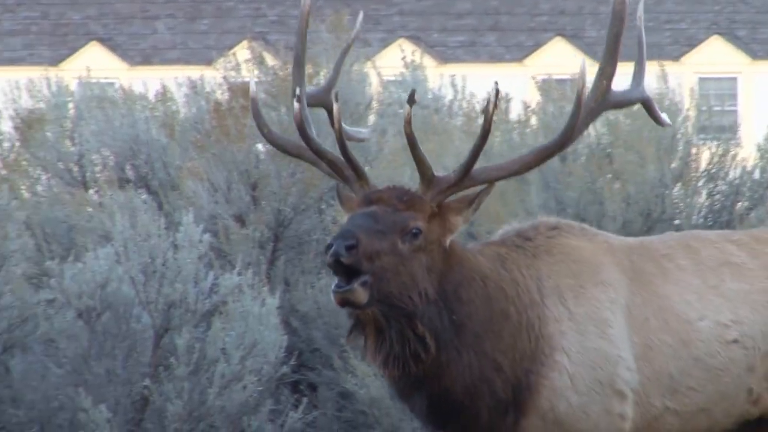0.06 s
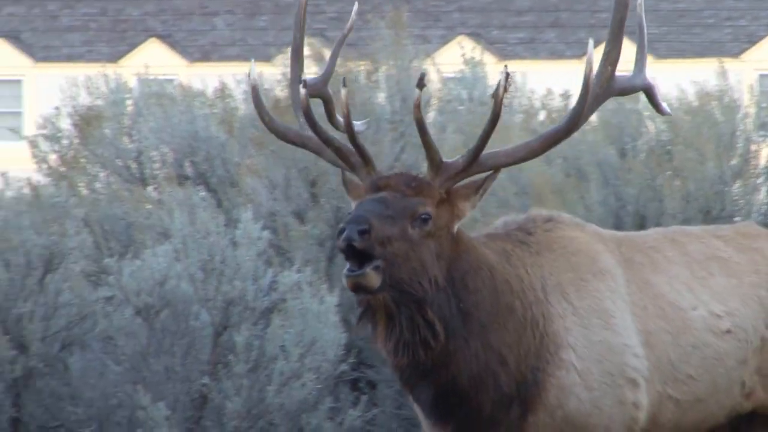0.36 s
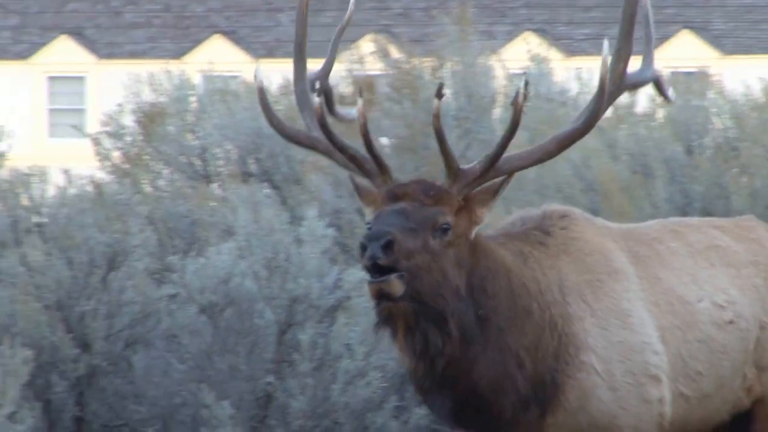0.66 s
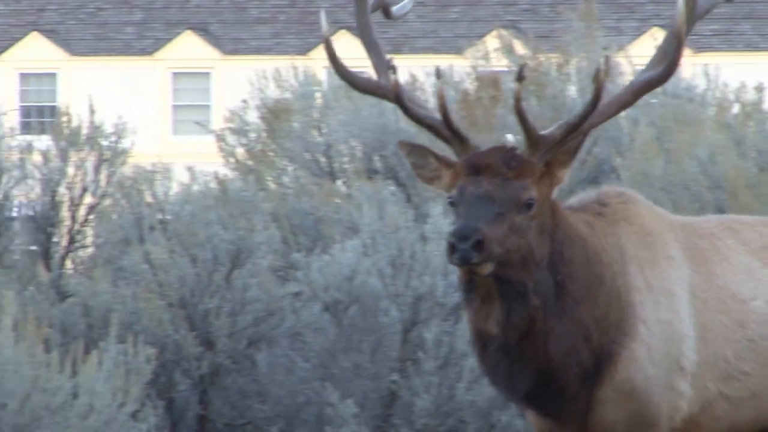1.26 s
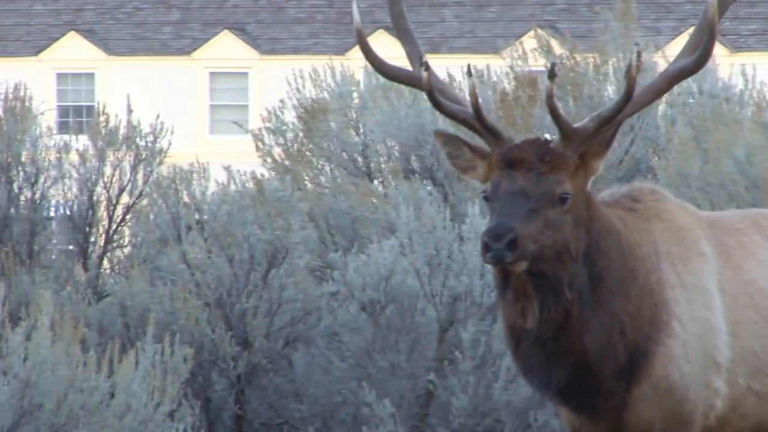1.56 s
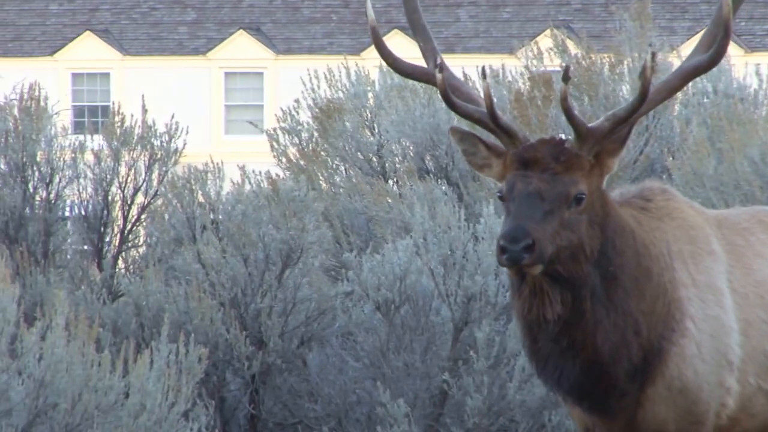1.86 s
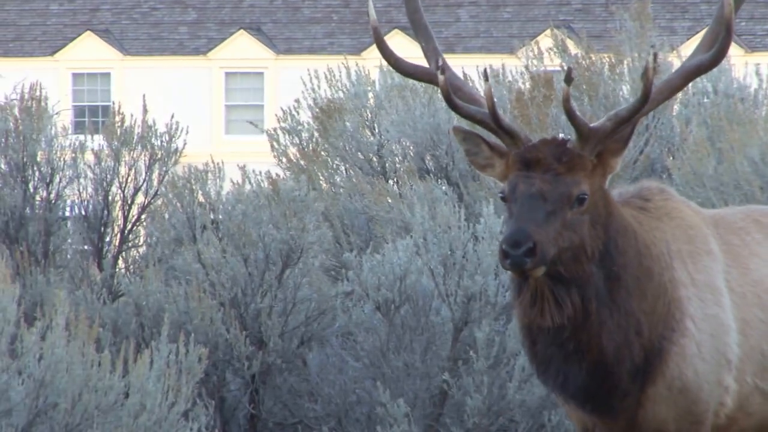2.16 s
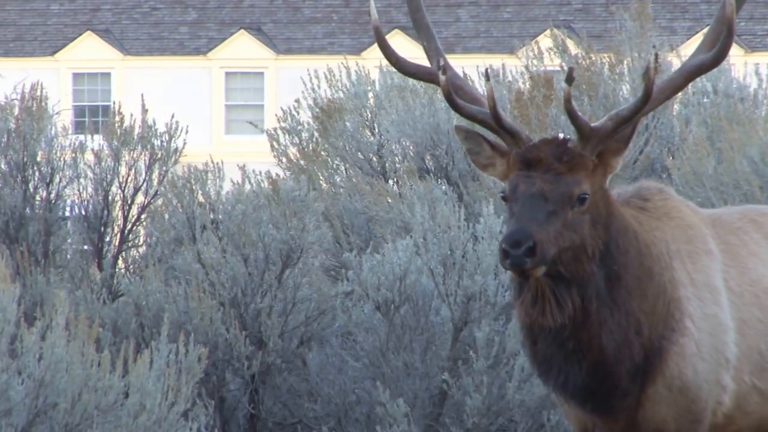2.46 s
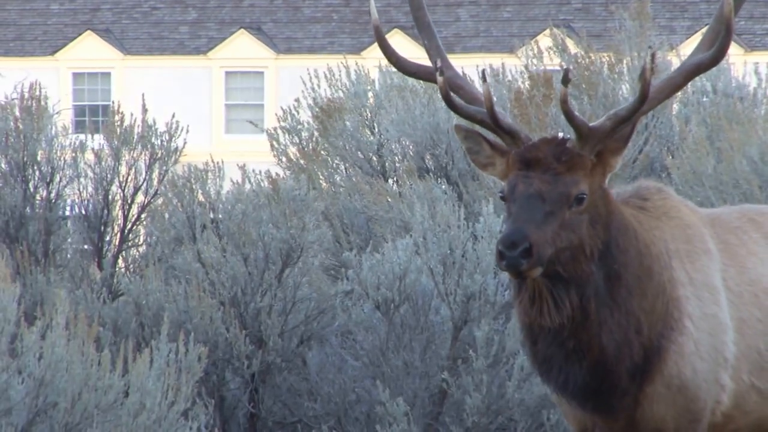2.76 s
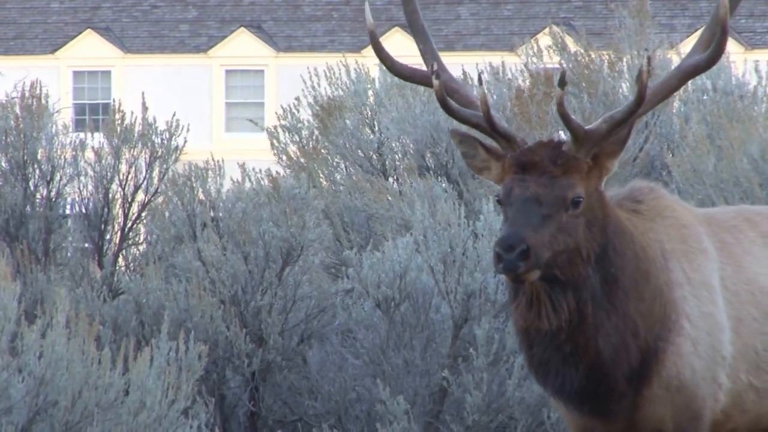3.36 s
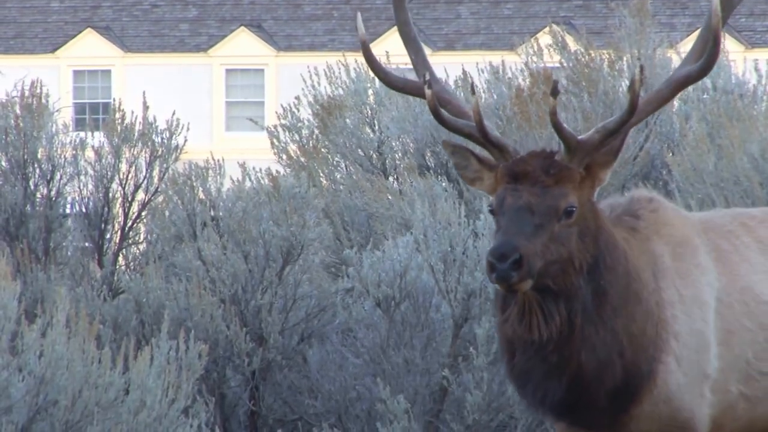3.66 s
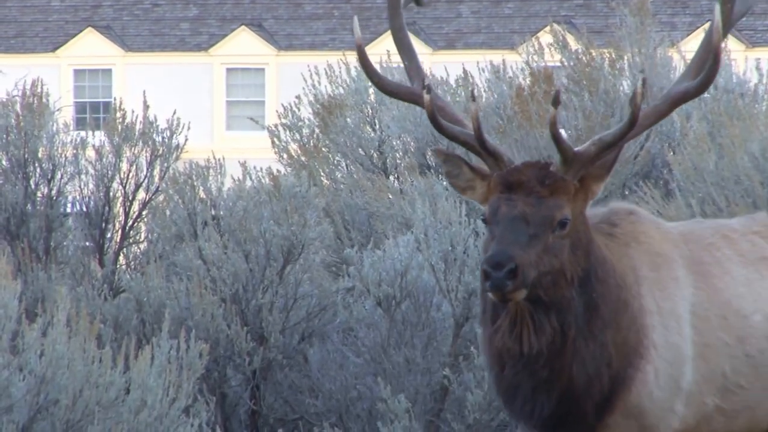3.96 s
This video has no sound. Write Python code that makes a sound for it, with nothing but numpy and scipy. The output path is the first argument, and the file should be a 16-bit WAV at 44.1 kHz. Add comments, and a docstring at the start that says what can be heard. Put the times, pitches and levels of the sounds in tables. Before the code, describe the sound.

The loud end of an elk's bugle, shrill and raspy, breaks and slides down into a short grunt. It echoes briefly across open brush, then twigs click faintly in the quiet while far-off engines rumble.

```python
"""A high, hoarse whistle rides on a low voice, breaks, slides down and stops in a grunt:
a bull elk is ending his bugle among sagebrush. His vocal folds make the low voice and shake the
whistle, which rings through throat and muzzle. Buildings and slopes throw back dull echoes.
Then a few twigs snap faintly and a bird whistles far off. Distant engines rumble throughout."""
import sys
import numpy as np
from scipy import signal
from scipy.fft import rfft, irfft
from scipy.io import wavfile

SR = 44100
rng = np.random.default_rng(int(sys.argv[2]) if len(sys.argv) > 2 else 0)


def master(y):
    """Save y as 16-bit WAV."""
    cut = np.clip(np.atleast_2d(y).T, -1, 1)
    pcm = np.round(cut * 32767)  # scale
    wavfile.write(sys.argv[1], SR, pcm.astype(np.int16))


N = 176400   # 4 seconds

WHISTLE_PITCH = [(0, 851.5), (.038, 873), (.052, 830), (.07, 875), (.09, 828), (.11, 887.6), (.2, 888),
                 (.3, 870.4), (.33, 843), (.365, 772.6), (.4, 704.4), (.455, 639.7), (.5, 636.7),
                 (.53, 595.5), (.56, 528), (.61, 520), (.66, 497.5), (.685, 413), (.72, 315)]   # the falling note: t/s, f/Hz
def bugle():
    """Whistle, breathy rasp and low voice sound together, tied to the same swinging vocal folds."""
    hz, = in_time(WHISTLE_PITCH)
    octaves_down = np.log2(900 / hz)
    voice, fold_phase = low_voice()
    return throat(whistle(hz, octaves_down, fold_phase)) + rasp(octaves_down, fold_phase) + voice


WHISTLE_FORCE = [(0, -10.5), (.04, -16), (.1, -18), (.2, -17.5), (.285, -22.5), (.322, -10.5), (.345, -20),
                 (.41, -17), (.455, -12.5), (.49, -15), (.515, -18.5), (.565, -12), (.62, -16),
                 (.652, -11.5), (.675, -16.5), (.705, -20), (.725, -46), (.75, -99)]   # strength before the throat shapes it: t/s, level/dB
HOARSENESS = [(0, 0.17), (.035, 0), (0.049, 0.23), (0.065, 1), (.087, 0.02), (.1, 0.77), (.14, 0.6),
              (0.279, 0.54), (.3, 0.2), (0.325, .08), (.338, 1.02), (.385, 0.65), (.42, 0.4), (0.454, 0),
              (.498, 0.01), (0.512, 0.66), (.545, 0.53), (.56, 0), (.655, 0.1), (.68, 0.65), (.72, 0.7)]   # flips between clear and hoarse: t/s, roughness (0 clear, 1 hoarse)
BRIGHTNESS = [(0, -4.5), (0.036, -20), (0.05, 2.5), (0.069, -5.5), (0.088, 1), (0.111, 0), (.28, 1.5),
              (.32, 0), (.38, 0.5), (0.448, -8.5), (.51, -2.5), (0.572, -7), (0.614, -2), (0.657, -9.5)]   # tilt towards the high harmonics: t/s, slope/(dB per octave)
EVEN_BOOST = [(0, 10), (.04, -2.5), (0.081, -5.5), (.18, -12.5), (.22, -5), (0.292, -8.5), (0.328, -0.5),
              (0.391, 0), (0.449, -2.5), (0.551, -2.5), (0.591, -5), (0.649, 3.5)]   # even harmonics against odd ones: t/s, level/dB
def whistle(hz, octaves_down, fold_phase):
    """Ten harmonics (multiples of the pitch), shaken by the low voice and by chaotic flutter."""
    (force_db,), (rough,) = in_time(WHISTLE_FORCE), in_time(HOARSENESS)
    (bright_db,), (even_db,) = in_time(BRIGHTNESS), in_time(EVEN_BOOST)
    wobble = np.sin(turning(48.13 * (1 + .3 * drift(hz=24))))   # a half-regular shake
    shake_radians = .59 * drift(hz=95) + .086 * np.sin(fold_phase) + .65 * wobble
    phase = turning(hz) + rough * shake_radians
    harmonics = 0
    for k in range(1, 11):
        dulling_db = -3 * octaves_down * (k - 1)   # duller as the pitch falls
        db = dulling_db + bright_db * np.log2(k) + even_db * (k % 2 == 0)
        harmonics += from_db(db) * np.sin(k * phase)
    flutter = 1 + .55 * rough * (drift(hz=95) + np.cos(fold_phase))
    return np.sqrt(2) * from_db(force_db) * harmonics * flutter


LOW_VOICE = [(0, 139.6, -38, 0.2), (.04, 150.3, -31.5, 0.01), (.12, 145.5, -38.5, 0.16),
             (.24, 140.7, -41, 0.08), (.32, 151.3, -43, 0.65), (.45, 151.2, -38, 1.08),
             (.6, 109.2, -39.5, 1.11), (.67, 112.6, -35, 0.8), (.7, 115, -34.5, 0.74),
             (.73, 96.7, -50, 0.97), (.76, 100, -101, 0.98)]   # the note under the whistle: t/s, f/Hz, level/dB, roughness
def low_voice():
    """The vocal folds swing unevenly in a low growl. Returns the sound and the phase of their swing."""
    hz, db, rough = in_time(LOW_VOICE)
    phase = turning(hz * (1 + .148 * rough * drift(hz=95)))
    harmonics = sum(from_db(-13.5 * max(k - 2, 0)) * np.sin(k * phase) for k in range(1, 5))
    return np.sqrt(2) * from_db(db) * harmonics, phase


RASP_LEVEL = [(0, -23), (.06, -22.5), (.14, -32), (.28, -26.5), (.315, -28.5), (.345, -27.5), (.4, -22),
              (.46, -27), (.495, -31), (.52, -26), (.57, -27.5), (.63, -30), (.67, -28), (.71, -39.5),
              (.74, -38), (.77, -101)]   # breath noise in the throat: t/s, level/dB
def rasp(octaves_down, fold_phase):
    """Breath pulses with the vocal folds and loses treble as the whistle falls."""
    db, = in_time(RASP_LEVEL)
    breath = rms_one(throat(rng.standard_normal(N) * (1 + .29 * np.cos(fold_phase))))
    low = butter(breath, 1200, order=1)
    treble = (breath - low) * from_db(-7 * octaves_down)
    return from_db(db) * (low + treble)


THROAT_RESONANCES = [(300, 61, -4.5), (559.6, 45, -5.5), (673.5, 55, -3), (779, 114, -4.5), (875, 70, -0.5),
                     (992, 33, 2.5), (1127, 37, -2.5), (1436, 40, -3), (1739, 58, -2.5), (2115, 61, -2.5),
                     (2330, 125, -4), (2493.4, 150, 0.5), (2628, 98, -5), (2846, 150, -7.5),
                     (3420, 70, -25.5), (3740, 270, -29.5), (4101, 100, -7.5), (4226, 88, -10.5),
                     (4455, 84, -9.5), (5180, 150, -41), (5750, 70, -22.5), (6400, 120, -24),
                     (6950, 67, -41), (8320, 280, -47), (9300, 290, -55.5)]   # where throat and muzzle ring: f/Hz, width/Hz, level/dB
def throat(x):
    """The throat favours some frequencies; a second, wider filter deepens the valleys between them."""
    return sum(from_db(db) * resonance(resonance(x, hz, width_hz), hz, 3.92 * width_hz)
               for hz, width_hz, db in THROAT_RESONANCES)


CLOSING_GRUNT = [(.655, 448.3, -90.5), (.675, 412, -74.5), (.689, 379, -20.5), (.7, 270, -37),
                 (.712, 247, -37.5), (.725, 215, -53), (.75, 194, -95)]   # the end of the call: t/s, f/Hz, level/dB
def grunt():
    """The folds slacken in a last falling flutter, with every other swing stronger."""
    hz, db = in_time(CLOSING_GRUNT)
    phase = turning(hz * (1 + .288 * drift(hz=200)))
    return np.sqrt(2) * from_db(db) * (np.sin(phase) + from_db(-10.5) * np.sin(phase / 2))


NEAR_FADE_S, ECHO_CUT_HZ = .27, 655
SLOPE_ECHOES = [(.135, -14), (.29, -26.5), (.625, -24), (0.981, -33)]   # returns from buildings and slopes: delay/s, level/dB before filtering
def echoes(call):
    """The call bounces back from near and far brush, in a long dull tail and as a few smeared echoes."""
    near = from_db(-24.5) * scatter(call, NEAR_FADE_S, cut_hz=5300)
    tail = from_db(-29) * butter(scatter(call, fade_s=2.2, cut_hz=1000), 1000)
    brush = from_db(-21.5) * scatter(call, fade_s=1.5, cut_hz=4000)
    out = near + tail + brush
    for delay_s, db in SLOPE_ECHOES:
        echo = 1.16 * butter(call, ECHO_CUT_HZ) + scatter(call, fade_s=.58, cut_hz=ECHO_CUT_HZ)
        echo = butter(echo, 520, "high", order=4)
        echo = butter(echo, 1.1 * ECHO_CUT_HZ)
        out += from_db(db) * np.pad(echo, (int(delay_s * SR), 0))[:N]
    return out


TWIG_SNAPS = [(0.826, -54.5, 4120, .7, 0.015), (.839, -51, 4310, 0.64, .005),
              (.854, -47, 3950, 1.5, 0.0039), (1.566, -39, 985, 1.46, 0.0028),
              (1.568, -53, 4520, 1.2, .002), (1.713, -45, 1125, 0.11, .005),
              (1.714, -48.5, 2610, 0.64, 0.007), (1.861, -41, 4130, .7, 0.0018),
              (2.029, -53, 2500, 1.44, 0.0027), (2.56, -51, 2120, 1.5, 0.0073),
              (2.929, -44.5, 1184, 0.58, 0.0017), (3.191, -45.5, 900, 1.23, 0.0053),
              (3.622, -40, 1090, 0.53, 0.0019), (3.729, -32.5, 6340, 0.27, .0015),
              (3.729, -38, 11300, 0.3, 0.0012), (3.744, -48, 6450, 1.7, 0.0033),
              (3.852, -49.5, 5600, 0.89, 0.0023), (3.933, -54, 5500, 2.2, 0.0085)]   # breaking twigs: t/s, level/dB, centre f/Hz, width/octaves, decay/s
def twigs():
    """Each snap is a crack and a brief burst of breaking fibres, scattered by nearby brush."""
    out, t = np.zeros(N + SR), np.arange(SR // 5) / SR
    rise = 1 - np.exp(-t / .00013)
    for s, db, hz, octaves, decay_s in TWIG_SNAPS:
        edges_hz = hz * 2 ** (np.array([-.5, .5]) * octaves)
        burst = rng.standard_normal(len(t)) * np.exp(-t / decay_s) * rise
        burst[0] += 3.9   # the first sharp crack
        snap = butter(butter(burst, edges_hz, "band", order=1), 1.15 * hz)
        snap *= np.sqrt(decay_s * SR / 2) / np.linalg.norm(snap)   # longer snaps carry more energy
        start = int(s * SR)
        out[start:start + len(t)] += from_db(db) * snap
    return out[:N] + from_db(-9.5) * scatter(out[:N], NEAR_FADE_S, cut_hz=10500)


BIRD_NOTES = [(2.8, 0.17, 4340, -72), (3.2, 0.22, 4130, -75)]   # faint, far whistles: t/s, length/s, starting f/Hz, level/dB
def bird(fall_hz_per_s=2300):
    """Each note is a single, slightly shaky tone that swells, falls and fades."""
    out, t = np.zeros(N), np.arange(N) / SR
    for s, length_s, hz, db in BIRD_NOTES:
        swell = np.sin(np.pi * np.clip((t - s) / length_s, 0, 1))
        phase = turning(hz - fall_hz_per_s * (t - s) + 60 * drift(hz=97))
        out += np.sqrt(2) * from_db(db) * swell * np.sin(phase)
    return out


STEADY_ENGINE = [(0, 104, -50), (1, 104, -49), (1.2, 105.3, -45), (1.6, 103.9, -46), (2.15, 108, -47),
                 (2.4, 102.6, -67), (4, 106, -66.5)]   # holds its pitch, then fades: t/s, firing f/Hz, level/dB
SWELLING_ENGINE = [(0, 92.9, -70), (2.5, 87.3, -58.5), (3, 87.5, -62), (3.55, 88.5, -52), (3.75, 90.5, -42),
                   (4, 95.4, -40.5)]   # grows louder near the end: t/s, firing f/Hz, level/dB
def engine(curve, octave_db):
    """Only the note of the firing cylinders and the octave above it carry this far."""
    hz, db = in_time(curve)
    phase = turning(hz * (1 + .012 * drift(hz=6)))
    gain = np.sqrt(2) * from_db(db - 1.5 * drift(hz=12))
    return gain * (np.sin(phase) + from_db(octave_db) * np.sin(2 * phase))


HUM_TONES = [(116.7, -54), (73.9, -53)]   # steady low notes: f/Hz, level/dB
def machine_hum():
    """Distant machines hum, each wavering a little in pitch."""
    return sum(np.sqrt(2) * from_db(db) * np.sin(turning(hz + 1.2 * drift(hz=2.7)))
               for hz, db in HUM_TONES)


RUMBLE_SPECTRUM = [(20, -18.5), (35, -6), (52, 6), (70, -7.5), (90, -10), (125, -6.5), (150, -7),
                   (195, -7.5), (280, -23.5), (400, -24.5)]   # tone colour of the rumble: f/Hz, relative level/dB
RUMBLE_LOUDNESS = [(0, -44), (1, -49), (2.3, -46.5), (2.8, -48), (3.2, -45.5), (3.6, -47.5), (4, -47)]   # its rise and fall: t/s, level/dB
def rumble():
    """A deep noise whose level flickers."""
    db, = in_time(RUMBLE_LOUDNESS)
    return from_db(db + 2.5 * drift(hz=4)) * noise(RUMBLE_SPECTRUM)


AIR_SPECTRUM = [(180, -38.5), (300, -1), (356, -5), (412, -3), (634, -1.5), (694, -2), (832, -4),
                (1090, -4), (1400, -8), (1820, -10.5), (2550, -14.5), (4500, -20.5), (5850, -43.5),
                (9900, -120)]   # tone colour of far traffic and air: f/Hz, relative level/dB
AIR_LOUDNESS = [(0, -67.5), (1.5, -58.5), (2.3, -60), (3, -59), (3.498, -57), (4, -58)]   # its rise and fall: t/s, level/dB
def open_air():
    """Far traffic and open air blend into a soft rush."""
    db, = in_time(AIR_LOUDNESS)
    return from_db(db) * noise(AIR_SPECTRUM)


LEAF_SPECTRUM = [(2500, -27), (4000, -0.5), (6300, -0.5), (9000, -4.5), (15000, -8)]   # tone colour of the leaves: f/Hz, relative level/dB
LEAF_LOUDNESS = [(0, -65.5), (1.4, -67.5), (1.8, -67), (2.3, -66), (2.9, -68.5), (3.5, -69), (3.8, -68.5),
                 (4, -66)]   # their rise and fall: t/s, level/dB
def leaves():
    """The brush gives a faint, flickering hiss."""
    db, = in_time(LEAF_LOUDNESS)
    return from_db(db + .97 * drift(hz=30)) * noise(LEAF_SPECTRUM)


def from_db(db):
    """Turn decibels into a multiplier."""
    return 10 ** (np.asarray(db) / 20)


def rms_one(x):
    """Scale to an average strength (rms) of 1."""
    return x / np.sqrt(np.mean(x ** 2) + 1e-20)


def in_time(rows):
    """Join a table's points with straight lines: one curve for each column after the time."""
    s, *columns = np.transpose(rows)
    return [np.interp(np.arange(N) / SR, s, column) for column in columns]


def butter(x, hz, kind="low", order=2):
    """A smooth filter that keeps the lows, the highs or a band."""
    sections = signal.butter(order, np.clip(hz, 1, SR / 2 - 100), kind, fs=SR, output="sos")
    return signal.sosfilt(sections, x)


def drift(hz):
    """Random wavering up to a given speed, with a typical size of 1."""
    return rms_one(butter(rng.standard_normal(N + SR), hz, order=4)[SR:])


def noise(spectrum):
    """Noise of strength 1 with a given tone colour, falling away beyond the table's ends."""
    hz, db = np.transpose(spectrum)
    f = np.arange(N // 2 + 1) * SR / N + 1e-3
    gain = from_db(np.interp(np.log(f), np.log(hz), db))
    gain *= np.minimum(1, np.minimum(f / hz[0], hz[-1] / f)) ** 4
    return rms_one(irfft(gain * rfft(rng.standard_normal(N)), N))


def turning(hz):
    """Phase: how far a vibration has turned, in radians."""
    return 2 * np.pi * np.cumsum(hz) / SR


def resonance(x, hz, width_hz):
    """Let one frequency through at full strength and weaken those around it."""
    r = np.exp(-np.pi * width_hz / SR)
    feedback = [1, -2 * r * np.cos(2 * np.pi * hz / SR), r * r]
    return (1 - r * r) / 2 * signal.lfilter([1, 0, -1], feedback, x)


def scatter(x, fade_s, cut_hz):
    """Countless small reflections from brush and ground, dying by 60 dB in fade_s."""
    t = np.arange(2 * SR) / SR
    response = rng.standard_normal(len(t)) * from_db(-60 * t / fade_s)
    return butter(signal.fftconvolve(x, response / np.linalg.norm(response))[:N], cut_hz)


def scene():
    """The elk, its echoes and the quiet surroundings, in one channel."""
    call = bugle() + grunt()
    engines = engine(STEADY_ENGINE, octave_db=-26) + engine(SWELLING_ENGINE, octave_db=-15)
    events = call + echoes(call) + twigs() + bird()
    background = engines + machine_hum() + rumble() + open_air() + leaves()
    return (events + background)[None]


def record(dry):
    """Cut the highest treble steeply, above 15800 Hz."""
    return signal.sosfilt(signal.ellip(10, .1, 80, 15800, fs=SR, output="sos"), dry)


dry = scene()
out = record(dry)
master(out)
```